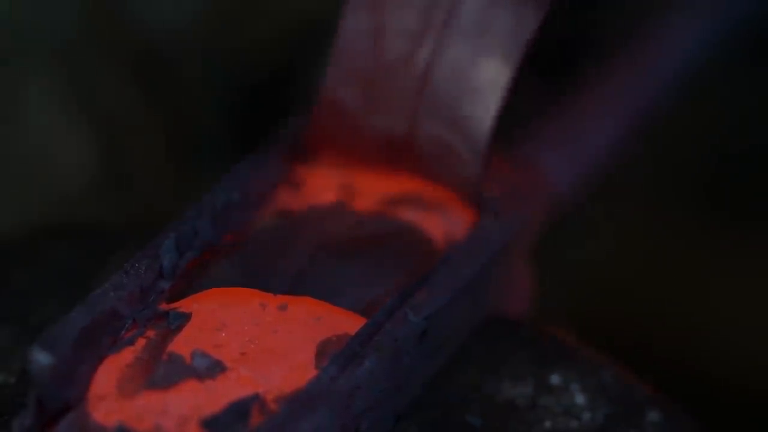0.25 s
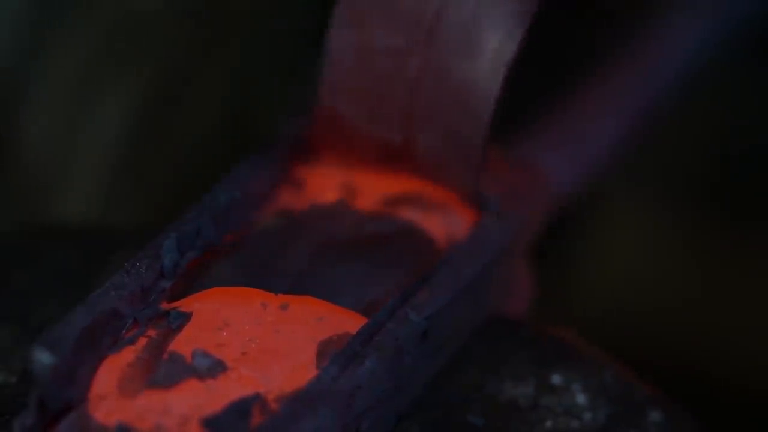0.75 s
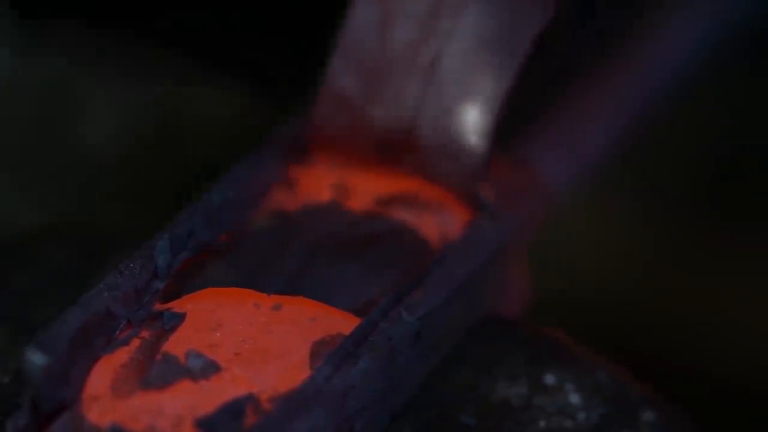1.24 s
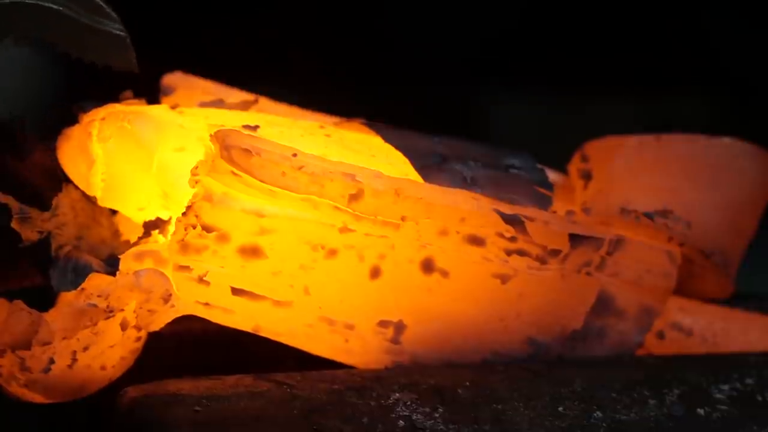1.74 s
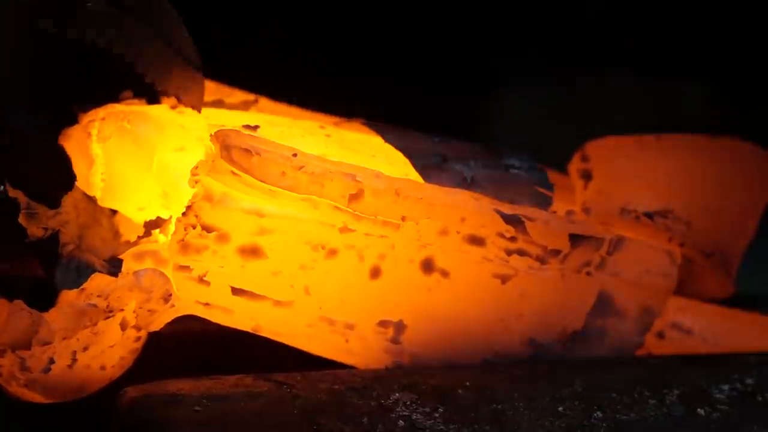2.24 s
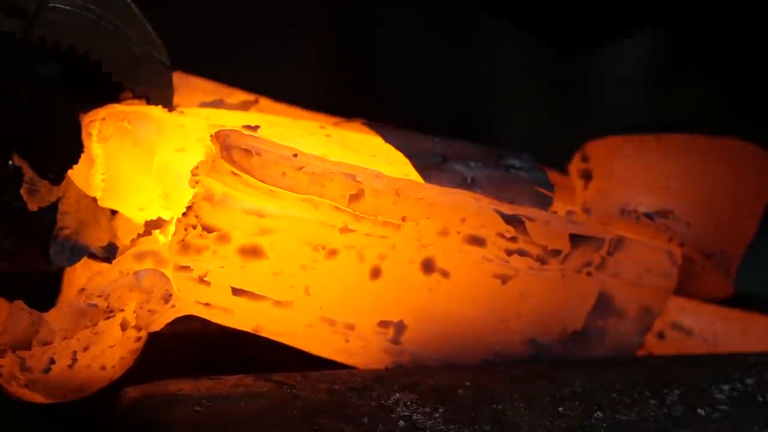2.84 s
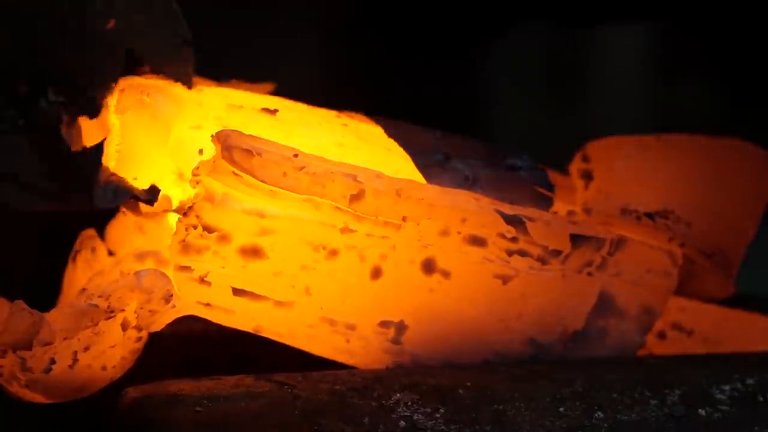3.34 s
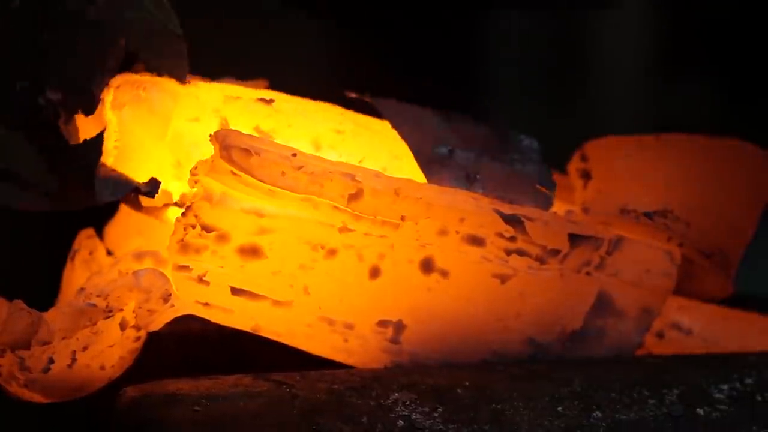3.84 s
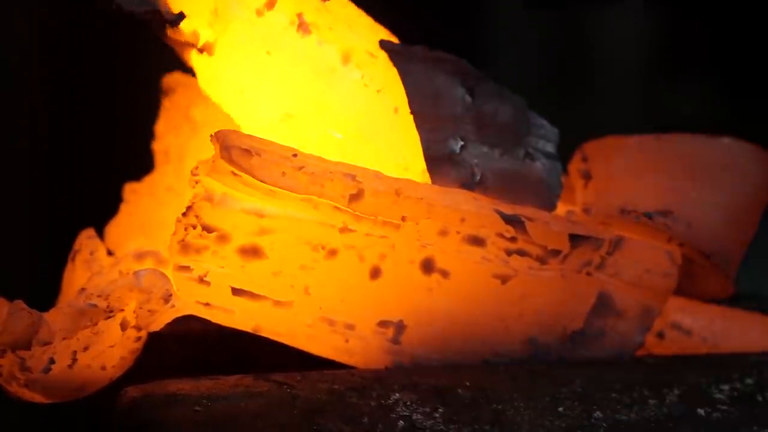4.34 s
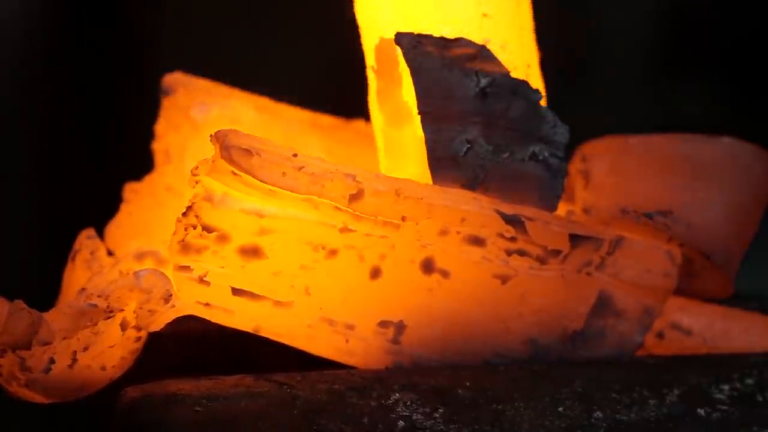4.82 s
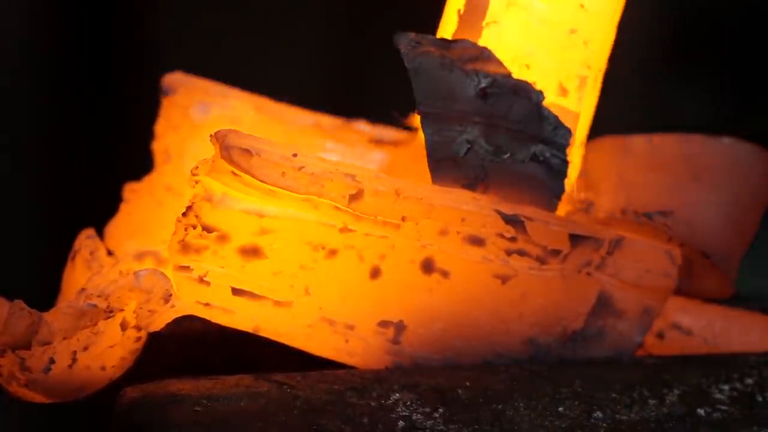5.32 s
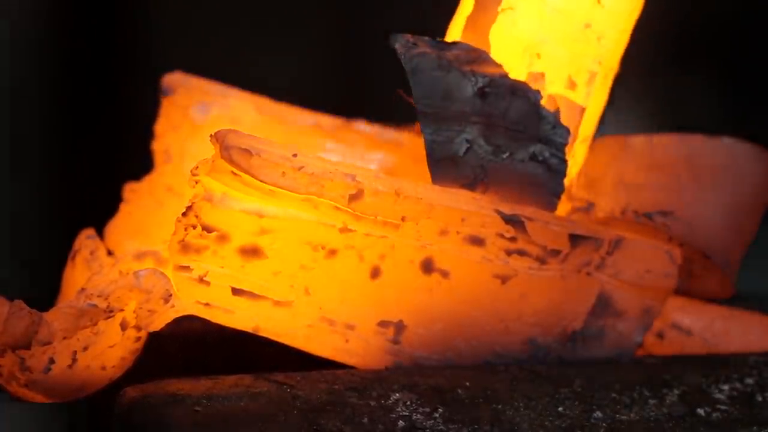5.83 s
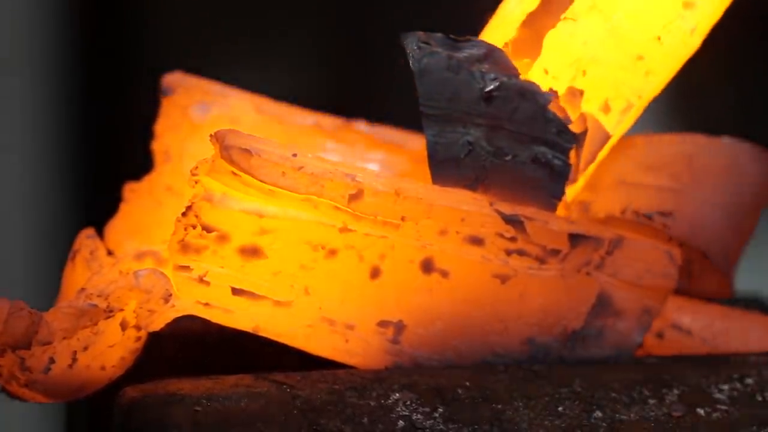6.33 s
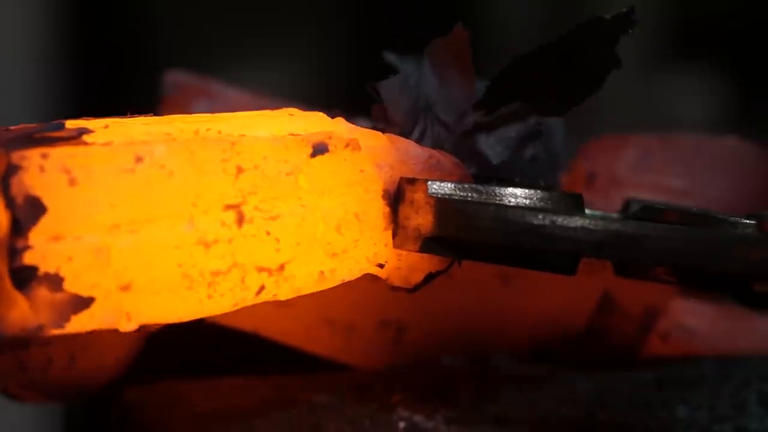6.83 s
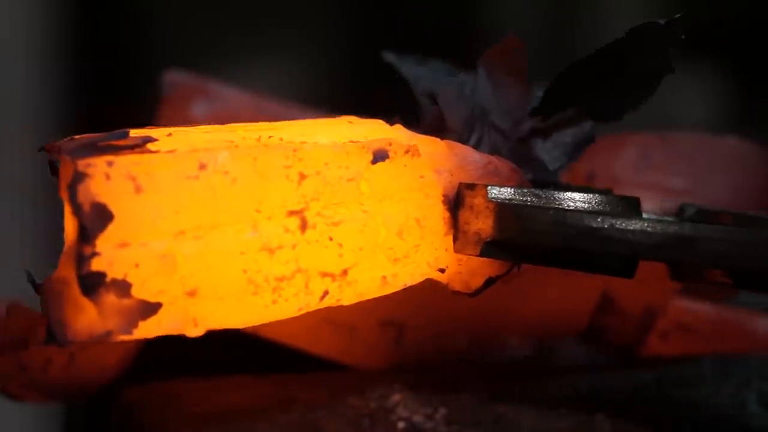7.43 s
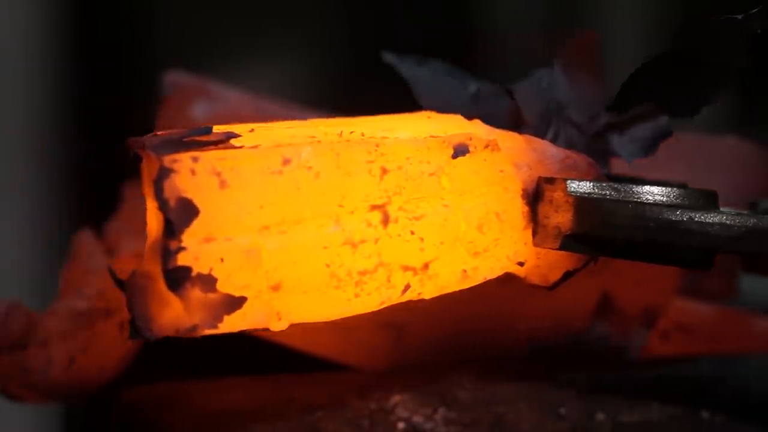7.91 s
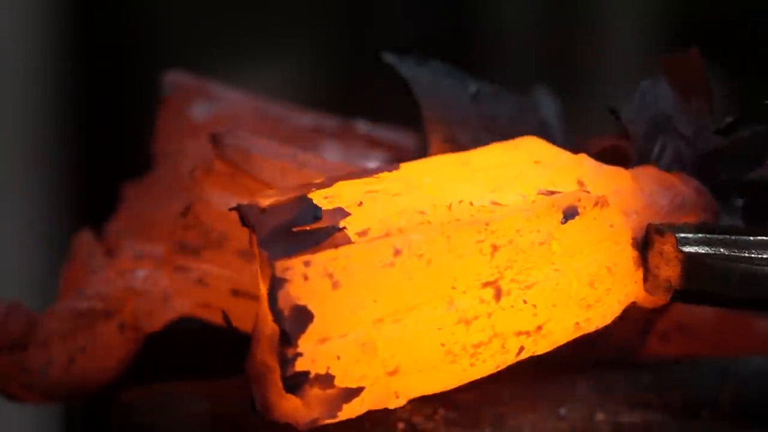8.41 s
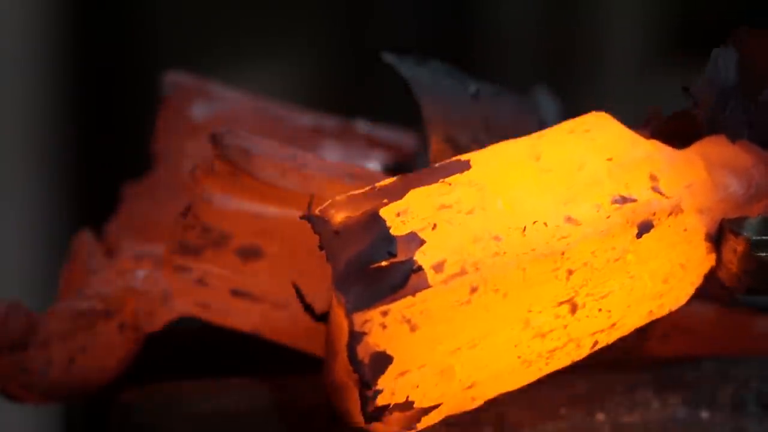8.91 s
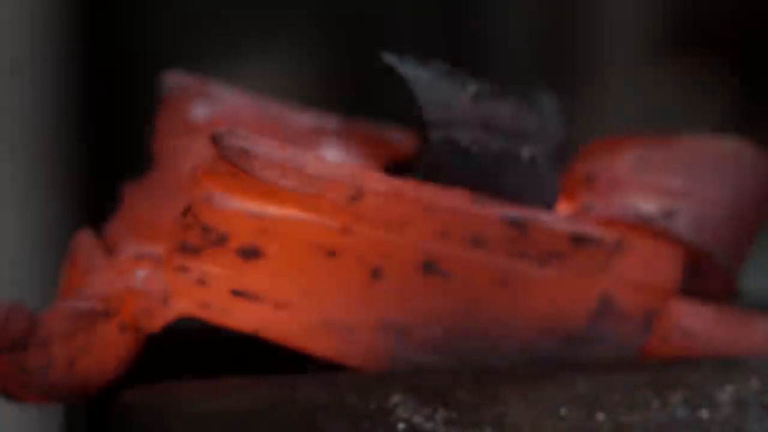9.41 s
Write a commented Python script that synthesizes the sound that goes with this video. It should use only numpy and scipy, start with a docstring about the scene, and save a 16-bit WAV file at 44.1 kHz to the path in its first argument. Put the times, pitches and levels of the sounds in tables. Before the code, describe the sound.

Close listening beside a forge: the fluttering low roar of the furnace dominates throughout, hum and thin gas hiss beneath. Early crumbling is faint; after the sudden change of spot, sharp glassy cracks and gritty crumbling stand out as hot scale breaks. A tiny creak, a short rasp and a weaker one accompany lifting, then a quick slide and paired clicks. Only the burner continues until one final tick. The room is short and dry.

```python
"""A gas forge burner roars and hisses steadily over a faint motor hum in a smithy; the flame booms in its furnace.
From 0.66 s oxide scale on the steel ticks and crumbles; at 1.5 s the listening spot changes, with a dull click.
More flakes snap; from 4.7 s the bent steel creaks and, as the piece is lifted, its crust scrapes twice.
At 6.3 s loose scale slides off, then come two short, dry clicks; a last snap, at two pitches, comes near 9.5 s.
Noise through resonances makes the burner; random impulses and short bursts in ringing flakes make the scale."""
import sys
import numpy as np
from scipy import signal
from scipy.fft import rfft, irfft, next_fast_len
from scipy.io import wavfile
from scipy.ndimage import uniform_filter1d, minimum_filter1d, map_coordinates

SR = 44100
rng = np.random.default_rng(int(sys.argv[2]) if len(sys.argv) > 2 else 0)


def dump_mix(stems):
    """Bounce the given channels to the path in sys.argv[1] as a 16-bit WAV at rate SR."""
    frames = np.atleast_2d(stems).T  # one column per channel
    limited = np.clip(frames, -1, 1)  # hard clip at full scale
    pcm = np.round(limited * 32767).astype(np.int16)
    wavfile.write(sys.argv[1], SR, pcm)


N = 426091

FRACTURES_PER_S = 3100  # tiny impulses within crumbling or scraping scale
CATCHES_PER_S = 130  # knots a second of the uneven level of crumbling and scraping


def amp(db):
    """Decibels to gain."""
    return 10 ** (np.asarray(db) / 20)


def unit(x):
    """Scale to rms 1."""
    return x / np.sqrt(np.mean(x ** 2) + 1e-20)


def along(points, hz):
    """Read (Hz, value) points at any frequency, on a log axis."""
    f, v = np.transpose(points)
    return np.interp(np.log(hz + 1), np.log(f + 1), v)


def curves(rows):
    """One value per sample for each column after the time."""
    s, *cols = np.transpose(rows)
    return [np.interp(np.arange(N) / SR, s, c) for c in cols]


def wobble(rate):
    """A smooth random curve through `rate` random knots a second."""
    knots = rng.standard_normal(int(N * rate / SR) + 4)
    return map_coordinates(knots, [np.arange(N) * rate / SR])


def filtered(x, response):
    """Multiply the spectrum of x by a response of frequency."""
    m = next_fast_len(len(x) + 8192)
    return irfft(rfft(x, m) * response(np.fft.rfftfreq(m, 1 / SR)), m)[:len(x)]


def noise(response):
    """Coloured noise of rms 1."""
    return unit(filtered(rng.standard_normal(N), response))


def impulses(count, per_s):
    """Sparse impulses at random moments with random sizes and signs."""
    return (rng.random(count) < per_s / SR) * rng.standard_normal(count)


def rise_and_fall(t, length, rise_share):
    """A straight rise to 1 and a straight fall to silence."""
    return np.interp(t / length, [0, np.clip(rise_share, .02, .98), 1], [0, 1, 0])


def bell(hz, centre, width):
    """A resonance curve of height 1, falling to half at one width from the centre."""
    return 1 / (1 + ((hz - centre) / width) ** 2)


def lowpass(hz, edge_hz, order):
    """Gain of a smooth, steep treble cut."""
    return 1 / np.sqrt(1 + (hz / edge_hz) ** (2 * order))


def add(track, s, sound):
    """Mix a sound into a track at time s."""
    part = track[max(round(s * SR), 0):][:len(sound)]
    part += sound[:len(part)]


def walls(x, echo_db, count=8):
    """Weak copies from nearby surfaces ripple the spectrum."""
    delays = rng.uniform(.002, .025, count)
    return filtered(x, lambda hz: 1 + amp(echo_db) * sum(np.exp(-2j * np.pi * hz * s) for s in delays))


def room(x, t60=0.15):
    """The smithy's short, diffuse answer: a decaying noise tail."""
    t = np.arange(SR // 3) / SR
    tail = rng.standard_normal(len(t)) * amp(-60 * t / t60) * (1 - np.exp(-t / .003))
    return signal.fftconvolve(x, tail / np.linalg.norm(tail))


def motor(moved):
    """Slightly unsteady hum lines, at levels that depend on the spot, over a low rumble."""
    # hum lines: pitch_hz, first_spot_db, second_spot_db, waver_db
    hum_lines = [(58.2, -48.5, -64, 0.5), (86, -76.5, -57.5, 1.5), (119.2, -43.5, -61.5, 1.2)]
    # colour of the rumble: frequency_hz, relative_level_db (per Hz)
    rumble_colour = [(20, -33), (40, -16.5), (60, 0), (90, 2.5), (135, 5.5), (170, -7), (300, -37),
                     (1000, -120)]
    t = np.arange(N) / SR
    hum = np.zeros(N)
    for hz, first_db, second_db, waver_db in hum_lines:
        level_db = first_db + moved * (second_db - first_db) + waver_db * wobble(5.1)
        phase = 2 * np.pi * hz * t + 0.17 * wobble(4.0)
        hum += amp(level_db) * np.sqrt(2) * np.sin(phase)
    rumble = noise(lambda hz: amp(along(rumble_colour, hz)))
    return hum + amp(-53.0) * rumble


def jet(spectrum, pipe, level_db, waver_db):
    """The gas jet hisses through the burner pipe, whose resonances colour it; its flow wavers a little."""
    def response(hz):
        lift_db = sum(db * bell(hz, c, w) ** 2 for c, w, db in pipe)
        return amp(along(spectrum, hz) + lift_db)
    hiss = unit(walls(noise(response), echo_db=-20))
    flow = unit(wobble(1.6) + wobble(25))
    return amp(level_db + waver_db * flow) * hiss


def resonating(modes):
    """Turbulence ringing in resonances: it flutters quickly but keeps an even strength."""
    def response(hz):
        radiated = hz ** 2 / (hz ** 2 + 80 ** 2)  # the furnace mouth radiates little deep bass
        return radiated * np.sqrt(sum((amp(db) * bell(hz, c, w)) ** 2 for c, w, db in modes))
    x = noise(response)
    power = np.abs(uniform_filter1d(x ** 2, size=SR // 6))
    return x / np.sqrt(power + 1e-9)


def flutter(depth_db):
    """Quick random surges and sags of the flame in dB, around a steady mean."""
    surge = wobble(14)
    return depth_db * unit(surge - uniform_filter1d(surge, size=SR // 3))


def flame(strength, furnace, boom, rush, roar_gain_db, boom_gain_db, rush_gain_db):
    """Combustion drives the main, lowest and upper furnace resonances; each drifts and flutters on its own."""
    roar_db, boom_db, rush_db = curves(strength)
    roar = amp(roar_db + roar_gain_db + flutter(1.14)) * resonating(furnace)
    low_boom = amp(boom_db + boom_gain_db + flutter(2.5)) * resonating(boom)
    upper_rush = amp(rush_db + rush_gain_db + flutter(1)) * resonating(rush)
    return roar + low_boom + upper_rush


def slide():
    """Loose scale slips over the steel with an uneven swish that brightens as it gathers speed."""
    # colours of the swish and of its treble fizz: frequency_hz, relative_level_db (per Hz)
    swish_colour = [(1500, -14), (2700, -1), (4300, -2), (5200, -14), (6500, -1.5), (7600, -7), (8600, -16),
                    (16000, -19)]
    fizz_colour = [(5000, -30), (6500, 3), (8600, -8), (11000, -2), (14000, 0), (16000, -5)]
    start_s, fizz_lag_s, t60_s = 6.297, .045, 0.18

    def swish(colour, onset_s, rise_s, db):
        t = np.arange(N) / SR - onset_s
        decay = amp(-60 * np.maximum(t - rise_s, 0) / t60_s)
        shape = np.clip(t / rise_s, 0, 1) * decay
        return amp(db + 1.6 * wobble(110)) * shape * noise(lambda hz: amp(along(colour, hz)))

    body = swish(swish_colour, start_s, rise_s=0.075, db=-50.5)
    fizz = swish(fizz_colour, start_s + fizz_lag_s, rise_s=0.053, db=-55)
    return body + fizz


def creaks():
    """Irregular slips ping one narrow resonance while the hot steel is bent."""
    # creaks and squeaks: start_s, length_s, level_db (rms before the fades), pitch_hz,
    # sharpness (pitch over half width), slips_per_s
    creak_list = [(4.745, 0.094, -67, 2530, 80, 1500), (4.808, 0.087, -60, 2550, 80, 1500),
                  (5.25, .36, -77, 10400, 60, 450), (5.69, 0.23, -73.5, 10400, 70, 320),
                  (6.06, .24, -75, 10200, 25, 600)]
    fade_s = .05
    stutter_per_s, stutter_db, uneven_db = 57, 4, 1
    out, t = np.zeros(N), np.arange(SR // 2) / SR
    for s, length, db, pitch_hz, sharpness, slips_per_s in creak_list:
        slips = impulses(len(t), slips_per_s)
        pings = unit(filtered(slips, lambda hz: bell(hz, pitch_hz, pitch_hz / sharpness)))
        shape = np.clip(np.minimum(t, length - t) / fade_s, 0, 1)
        # sticking and letting go, heard as a fast rise and fall of level
        stutter = np.sin(2 * np.pi * stutter_per_s * t + 2 * wobble(15)[:len(t)])
        level_db = db + stutter_db * stutter + uneven_db * wobble(20)[:len(t)]
        add(out, s, amp(level_db) * shape * pings)
    return out


def scrapes():
    """The crust drags over the steel: a bright rasp that catches and slips as it swells and fades."""
    # scrapes as the piece is lifted: start_s, length_s, level_db (rms before shaping), rise_share (of length)
    scrape_list = [(4.862, 0.095, -49, 0.24), (5.005, .17, -66.5, 0.26)]
    # colour of the rasp: frequency_hz, relative_level_db (per Hz)
    colour = [(7000, -40), (9300, -31), (9900, -2), (10400, 1), (11000, -7), (12100, -11), (12900, -20),
              (13600, -12), (14400, -19), (15250, -6), (16000, -13)]
    catch_db = 2.5
    out, t = np.zeros(N), np.arange(SR // 2) / SR
    for s, length, db, rise_share in scrape_list:
        slips = impulses(len(t), FRACTURES_PER_S)
        rasp = unit(filtered(slips, lambda hz: amp(along(colour, hz))))
        level_db = db + catch_db * wobble(CATCHES_PER_S)[:len(t)]
        rasp = amp(level_db) * rise_and_fall(t, length, rise_share) * rasp
        add(out, s, rasp)
        add(out, s, amp(-10) * room(rasp, t60=.2))
    return out


def flake(x, pitch_hz, sharpness, upper_db):
    """A flake radiates at its lowest mode, broadly above it and hardly below."""
    def response(hz):
        s = 1j * hz / pitch_hz
        mode = s / sharpness / (s * s + s / sharpness + 1)
        edge = s * s / (s * s + 0.78 * s + 1.02)  # cuts what lies below the pitch
        return (mode * edge ** 2 + amp(upper_db) * edge ** 3) * lowpass(hz, 17000, order=12)
    return filtered(x, response)


def crumbles():
    """Runs of tiny, uneven fractures swell and die away, coloured by the crust they run through."""
    # crumbling and rubbing: start_s, length_s, level_db (rms before shaping), flake_pitch_hz,
    # higher_modes_db, rise_share (of length)
    runs = [(.66, 0.045, -56, 5600, -22, .05), (.72, .15, -66, 5970, -24, .35),
            (.92, .17, -65.5, 6220, -22, .5), (1.523, 0.091, -45.5, 6700, -5, .1),
            (1.524, 0.046, -45, 10400, -6, .15), (1.524, .13, -58.5, 5500, -13.5, .2),
            (2.552, .07, -63, 6500, -16, .2), (2.555, .08, -66, 12500, -6, .45),
            (3.364, 0.059, -52, 6500, -9, .3), (3.366, 0.039, -55, 2800, -8, .25),
            (3.385, .09, -58, 13800, -12, .15), (3.5, .33, -72, 11500, -2, .4),
            (3.836, 0.065, -58, 7300, -26, .1), (4.07, 0.058, -58, 11000, -15, .13),
            (4.11, 0.14, -67, 11500, -5, .35), (4.241, 0.12, -58, 11000, -6, .25),
            (4.36, .17, -67, 11200, -5, .12), (5.3, .24, -71, 9600, -14, .65)]
    # broad resonances of the crust: centre_hz, width_hz, lift_db
    crust_modes = [(5240, 190, 6), (6700, 350, 4), (8100, 250, 7), (10300, 670, 7), (13600, 500, 5.5),
                   (15400, 350, 6)]
    clump_db = 1.5

    def crust(hz):
        return amp(sum(db * bell(hz, c, w) ** 2 for c, w, db in crust_modes))

    out, t = np.zeros(N), np.arange(SR // 2) / SR
    for s, length, db, pitch_hz, upper_db, rise_share in runs:
        fractures = impulses(len(t), FRACTURES_PER_S)
        flakes = flake(fractures, pitch_hz, sharpness=14, upper_db=upper_db)
        level_db = db + clump_db * wobble(CATCHES_PER_S)[:len(t)]
        run = amp(level_db) * rise_and_fall(t, length, rise_share) * unit(filtered(flakes, crust))
        add(out, s, run)
        add(out, s, amp(-11.0) * room(run, t60=0.32))
    return out


def crack(t60, pitch_hz, sharpness, upper_db):
    """A brief noise burst through a flake's resonance, of peak 1."""
    t = np.arange(SR // 6) / SR
    burst = rng.standard_normal(len(t)) * amp(-60 * t / t60)
    x = flake(burst, pitch_hz, sharpness, upper_db)
    return x / np.abs(x).max()


def clicks():
    """Dry clicks with no echo: a short bright one, and two dull ones that die away at once."""
    # dull clicks: start_s, peak_db
    dull_clicks = [(1.524, -36), (6.579, -26.5)]
    decay_s = 0.0012
    out, t = np.zeros(N), np.arange(SR // 20) / SR
    add(out, 6.5733, amp(-25.5) * crack(0.0046, 10250, sharpness=26, upper_db=-29))
    for s, db in dull_clicks:
        add(out, s, amp(db) * np.exp(-t / decay_s))
    return out


def snap(pitch_hz, upper_db, ring_db, focus_db, body_db):
    """A crack over a duller knock rings the large sheet of scale, most near the crack's own pitch; peak 1."""
    # modes of the large sheet of scale: pitch_hz, relative_level_db, t60_s
    sheet_modes = [(5270, -17, .06), (6350, -15, .06), (7070, -11, .045), (8020, -3, .045), (8170, -9, .04),
                   (9450, -17, .04), (10600, -5, .025), (11350, 0, .075), (12700, -9, .03),
                   (13640, -3, .11), (15400, -6, .022)]
    x = crack(0.011, pitch_hz, sharpness=22, upper_db=upper_db)
    x = x + amp(body_db) * crack(0.0042, 1950, sharpness=4.3, upper_db=-10.0)
    t = np.arange(len(x)) / SR
    ring = np.zeros(len(x))
    for hz, db, t60 in sheet_modes:
        off_pitch_db = focus_db * abs(np.log2(hz / pitch_hz))
        level_db = db + rng.normal(0, 1) - off_pitch_db - 60 * t / t60
        ring += amp(level_db) * np.sin(2 * np.pi * (hz * t + rng.random()))
    x = x + amp(ring_db) * ring * (1 - np.exp(-t / 0.00026))
    return x / np.abs(x).max()


def ticks(count=3):
    """Each snap of the scale sheds a few small, higher splinters, and the room answers."""
    # snaps of scale, one row per pitch: start_s, peak_db (before splinters and room), flake_pitch_hz,
    # higher_modes_db, sheet_ring_db, focus_db (fall of the ring per octave away from the pitch), knock_db
    snaps = [(0.6625, -37, 5600, -24, -22, 60, -25), (.6612, -42, 6700, -20, -50, 20, -25),
             (.661, -40, 3000, -12, -43, 20, -15), (1.5455, -35, 6650, -18, -39, 20, -21),
             (1.561, -28.5, 10300, -16, -30, 18, -26), (1.587, -37, 6700, -25, -26, 20, -25),
             (1.6, -29, 7000, -16, -1, 70, -23), (1.6005, -29, 13550, -21, -26, 45, -25),
             (1.6035, -34, 13640, -30, -30, 46, -24), (2.2528, -51, 10500, -12, -40, 18, -10.5),
             (2.2904, -47.5, 10640, -18, -37, 20, -19), (2.55, -44, 5270, -18, 0, 43, -20),
             (3.3644, -49, 11100, -12, -35, 20, -20), (3.3796, -25.5, 11100, -12, -35, 20, -17),
             (3.381, -25.5, 13700, -11, -22, 40, -20), (3.381, -36, 6500, -22, -35, 20, -14),
             (3.5484, -52, 10700, -15, -35, 20, -24), (3.5753, -53, 12200, -16, -35, 20, -25),
             (3.7718, -52, 10400, -15, -34, 20, -25), (3.7989, -41, 14130, -14, -26, 20, -20),
             (3.8144, -35, 14180, -14, -23, 20, -20), (3.8326, -25, 7940, -31, -7, 60, -19),
             (3.833, -23.5, 13700, -10, -22, 30, -22), (3.8374, -28, 11400, -11, -19, 20, -20),
             (3.838, -41, 6400, -28, -2, 90, -30), (4.0719, -43, 10500, -21, -34, 20, -20),
             (4.136, -51, 14000, -14, -30, 20, -20), (4.1704, -49, 14000, -14, -30, 20, -20),
             (4.2327, -23, 8200, -32, -12, 70, -15), (4.233, -23, 10750, -12, -8, 22, -27),
             (4.2331, -21, 13700, -2, -12, 26, -30), (4.2735, -44, 9600, -10, -30, 20, -20),
             (4.296, -41, 11000, -6, -24, 20, -20), (4.3047, -35, 10970, -10, -24, 10, -20),
             (4.342, -43, 10700, -14, -30, 20, -20), (4.358, -33, 11300, -8, -8.5, 20, -9),
             (4.3834, -47, 13700, -14, -20, 20, -20), (4.436, -43, 13500, -28, -10, 60, -20),
             (4.7885, -53, 9600, -7, -35, 19, -20), (6.1619, -45.5, 10200, -20, -40, 20, -20),
             (9.484, -38.5, 11400, -30, -3, 65, -8), (9.484, -41.5, 8050, -25, -3, 50, -20)]
    splinter_db, splinter_s = -15, 0.015  # the splinters start within this time
    out = np.zeros(N)
    for s, db, pitch_hz, upper_db, ring_db, focus_db, body_db in snaps:
        sound = snap(pitch_hz, upper_db, ring_db, focus_db, body_db)
        for delay, smallness in rng.random((count, 2)):
            splinter = crack(.012, pitch_hz * (1 + .1 * smallness), sharpness=8, upper_db=upper_db)
            # later splinters are weaker
            add(sound, delay * splinter_s, amp(splinter_db - 6 * delay) * splinter)
        add(out, s, amp(db) * sound)
        add(out, s, amp(db - 10) * room(sound))
    return out


def scene():
    """The burner heard from two spots in turn, with the scale on top."""
    # slow drift of the flame at each spot: time_s, roar_db, boom_db, rush_db (each before a fixed gain below)
    flame_a = [(0.0, -21.5, -29, -46), (0.7, -23.0, -34.5, -48), (1.15, -25, -39.5, -46),
               (1.5, -22, -37.5, -48)]
    flame_b = [(1.55, -17.5, -32.5, -50), (2.15, -19, -32.5, -50), (2.85, -21.5, -34, -50.5),
               (3.22, -20.5, -31.5, -51), (3.9, -21, -39, -53.5), (4.6, -22, -40.5, -51.5),
               (5.25, -21.5, -42, -50.0), (5.75, -25, -43.5, -52.5), (6.0, -22.5, -43, -48),
               (6.48, -24, -37.5, -49), (6.7, -19, -31.5, -50.5), (7.2, -21, -33, -50),
               (7.75, -19.5, -33.5, -49.5), (8.0, -21.5, -36, -52.5), (8.4, -19, -40, -49.5),
               (8.75, -22.3, -38.5, -51.5), (9.0, -18.5, -31, -49.5), (9.65, -19, -41, -50)]
    # main, lowest and upper furnace resonances at each spot: centre_hz, width_hz, relative_level_db
    furnace_a = [(254, 22, -9.5), (309, 30, -8), (316.7, 18, 2), (354, 18, -23.5), (442, 33, -17),
                 (500, 67, -24)]
    furnace_b = [(248.6, 15, -2), (271.6, 25.6, -2), (296.5, 15, 2.5), (331.8, 11.2, 1.5),
                 (366.6, 36.4, -7), (394.9, 11.9, -3), (423.8, 15, -9.5), (463.3, 26, -17.5),
                 (511.4, 21, -22)]
    boom_a = [(177, 8.3, 0), (192, 22, -6)]
    boom_b = [(154, 9.8, -8.5), (176.8, 18, 1.5), (210, 13, 0.5)]
    rush_a = [(641, 50, -5), (722, 46, -1), (785, 65, -7.5), (930, 50, -19.5), (1080, 79, -20.5)]
    rush_b = [(600, 40, 1.5), (720, 39, -4.5), (828, 48, -5), (897, 17, -13), (1000, 21, -16),
              (1090, 33, -14.5)]
    # colour of the gas jet at each spot: frequency_hz, relative_level_db (per Hz)
    jet_a = [(590, -37), (1000, -4.5), (1220, -5.5), (1470, -0.5), (1850, -1), (2080, -8.5), (2470, -2.5),
             (3420, -10.5), (3710, -12), (4570, -12), (5130, -15.5), (5970, -13), (7700, -18.5),
             (15100, -23.5), (16000, -26.5)]
    jet_b = [(590, -29.5), (1000, 1), (1100, -2), (1240, -7.5), (1800, -7.5), (2820, -14), (2950, -15),
             (4170, -14), (4790, -21.5), (5830, -19), (6930, -25.5), (8140, -24.5), (11900, -28),
             (13800, -30), (15700, -38.5)]
    # burner pipe resonances at each spot: centre_hz, width_hz, lift_db
    pipe_a = [(1865, 50, 4), (2540, 70, 1), (2730, 60, 2.5), (4520, 110, 3), (5500, 40, 1.5)]
    pipe_b = [(1500, 18, 1.3), (1770, 18, 3.8), (1840, 21, 6.4), (2340, 50, 5.1), (2560, 34, 5),
              (2792, 37, 4.7), (4320, 43, 3.6), (6060, 340, 2.2), (8000, 250, 4.5)]

    move_s, crossing_s = 1.523, .006
    moved = np.clip((np.arange(N) / SR - move_s) / crossing_s, 0, 1)
    first = flame(flame_a, furnace_a, boom_a, rush_a, roar_gain_db=-0.6, boom_gain_db=-1.0, rush_gain_db=-1.5)
    first = first + jet(jet_a, pipe_a, level_db=-58.5, waver_db=0.7)
    second = flame(flame_b, furnace_b, boom_b, rush_b,
                   roar_gain_db=-0.62, boom_gain_db=-1.2, rush_gain_db=-1.13)
    second = second + jet(jet_b, pipe_b, level_db=-58, waver_db=0.7)
    burner = np.sqrt(1 - moved) * first + np.sqrt(moved) * second  # equal-power crossing
    scale = slide() + scrapes() + crumbles() + ticks()
    return motor(moved) + burner + creaks() + scale + clicks()


def record(dry):
    """A limiter holds the highest swells down; a steep cut removes the top of the treble."""
    needed = np.minimum(1, amp(-9.2) / (np.abs(dry) + 1e-9))
    held = minimum_filter1d(needed, size=SR // 50)
    gain = uniform_filter1d(uniform_filter1d(held, size=SR // 100), size=SR // 100)
    return filtered(dry * gain, lambda hz: lowpass(hz, 15850, order=120))


dry = scene()
out = record(dry)
dump_mix(out)
```